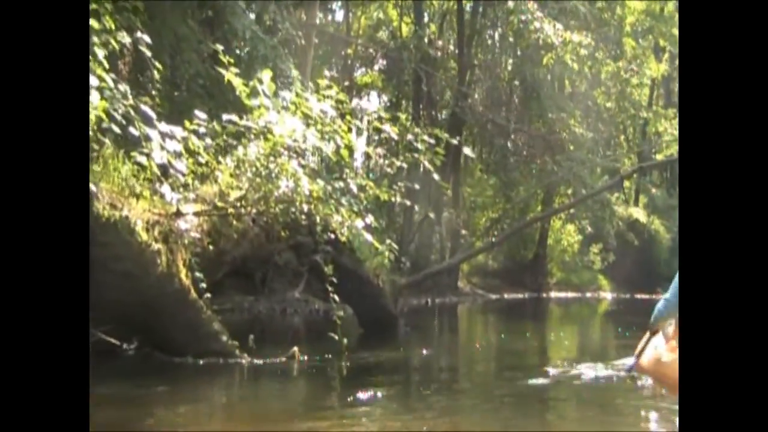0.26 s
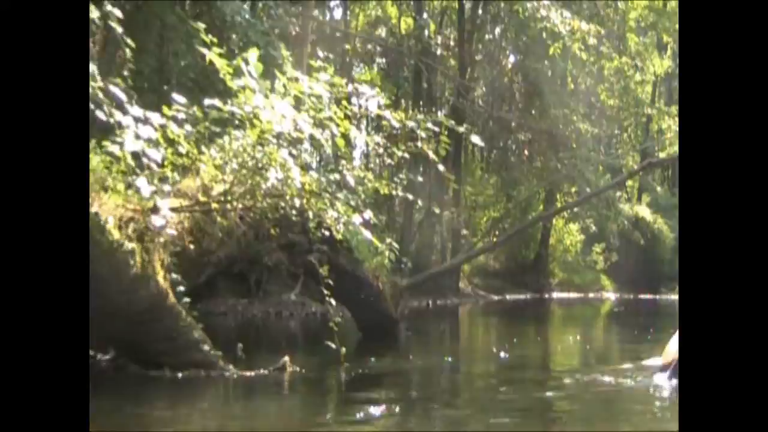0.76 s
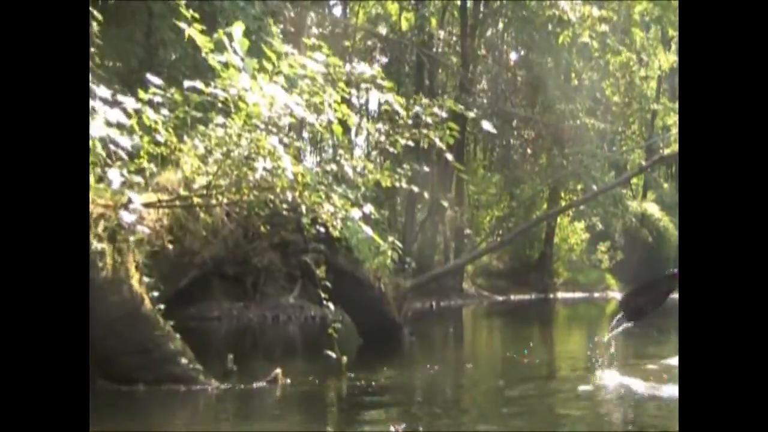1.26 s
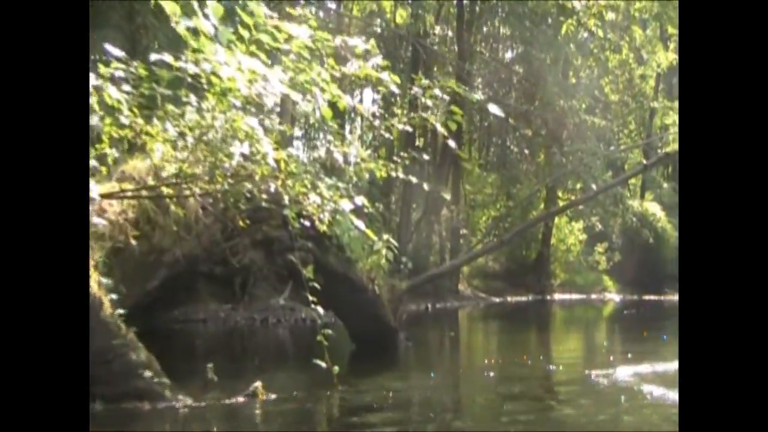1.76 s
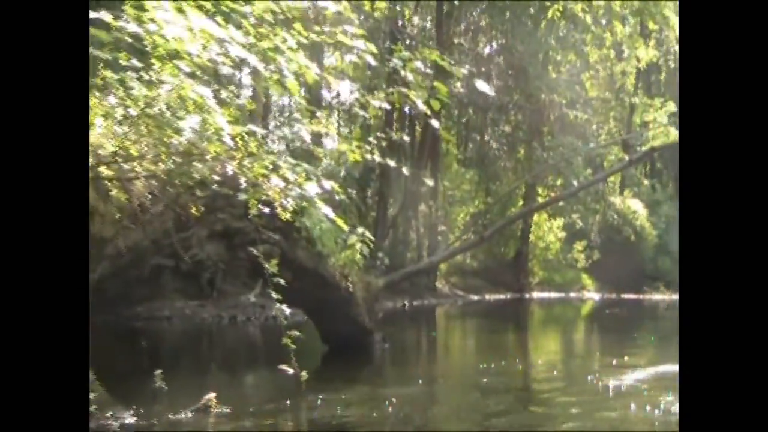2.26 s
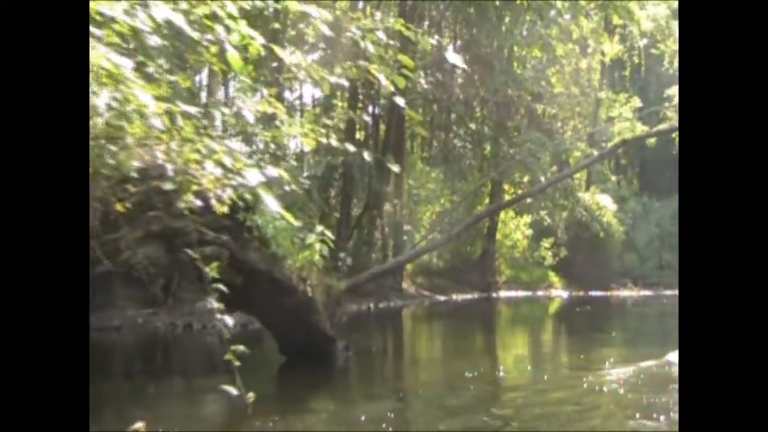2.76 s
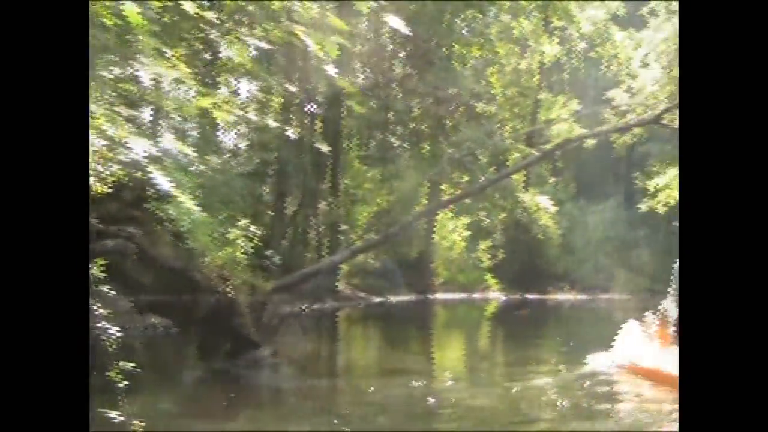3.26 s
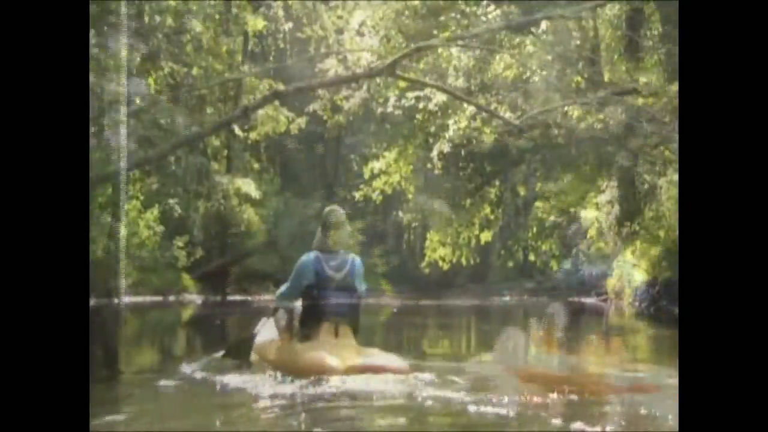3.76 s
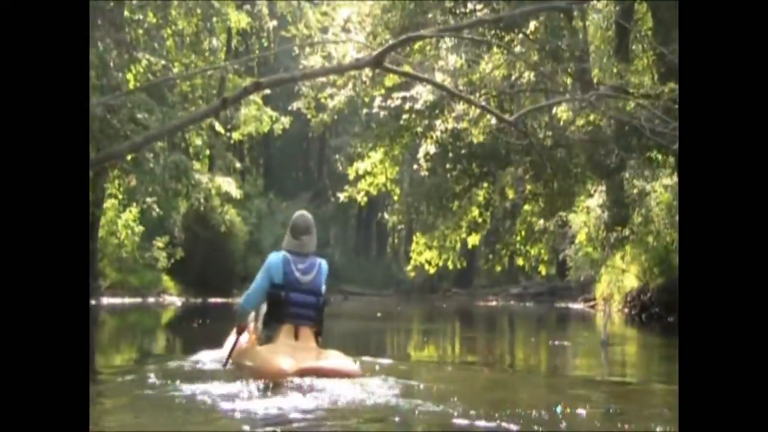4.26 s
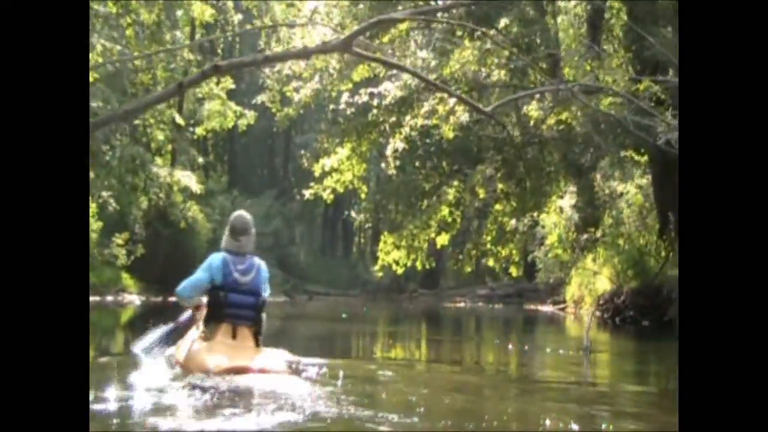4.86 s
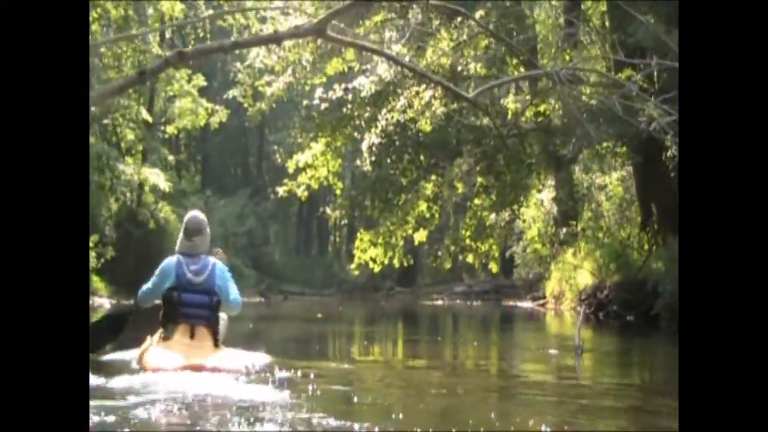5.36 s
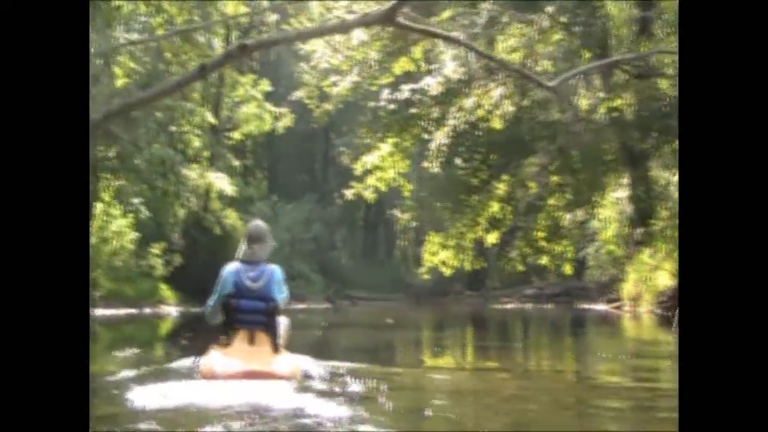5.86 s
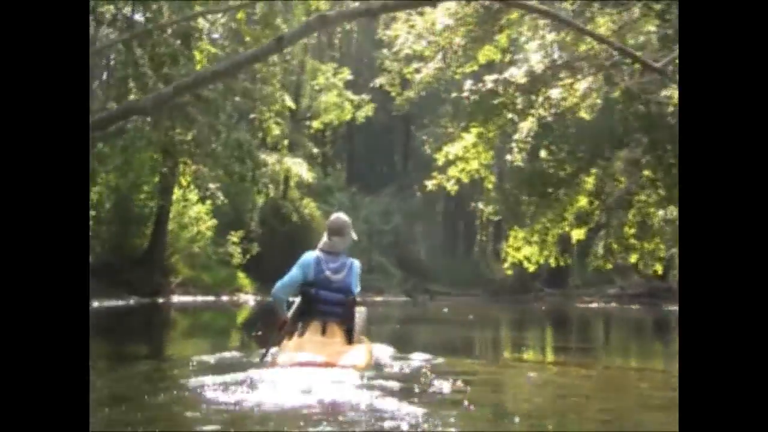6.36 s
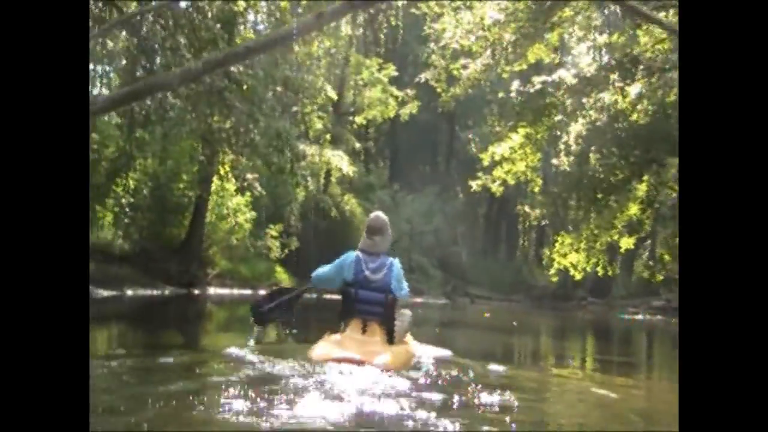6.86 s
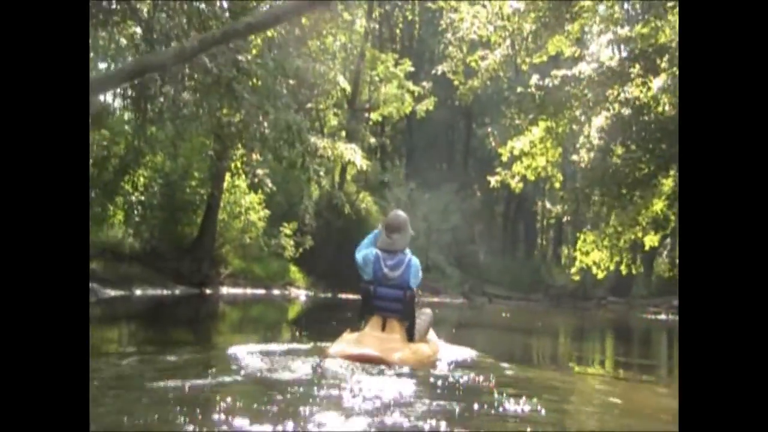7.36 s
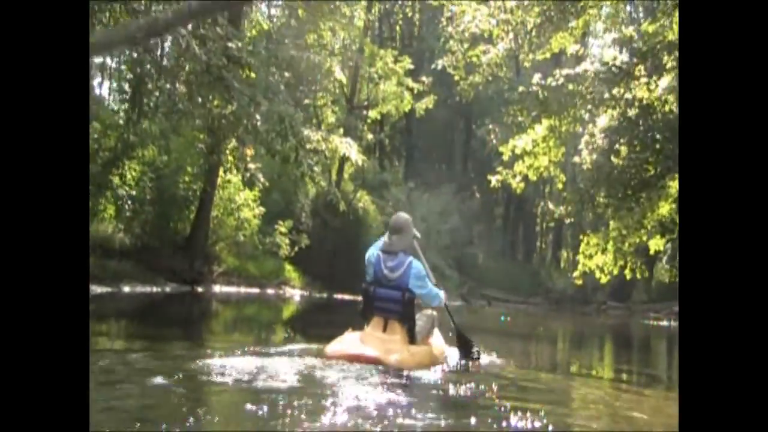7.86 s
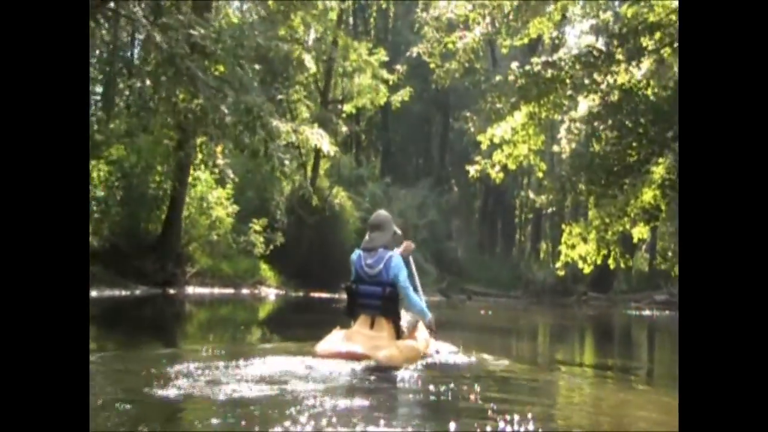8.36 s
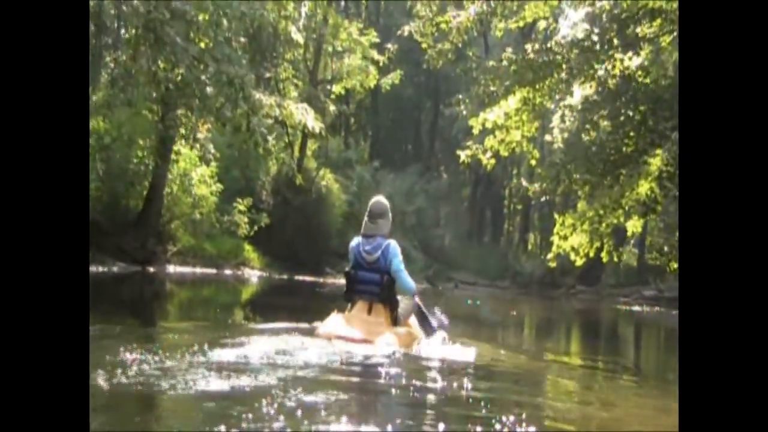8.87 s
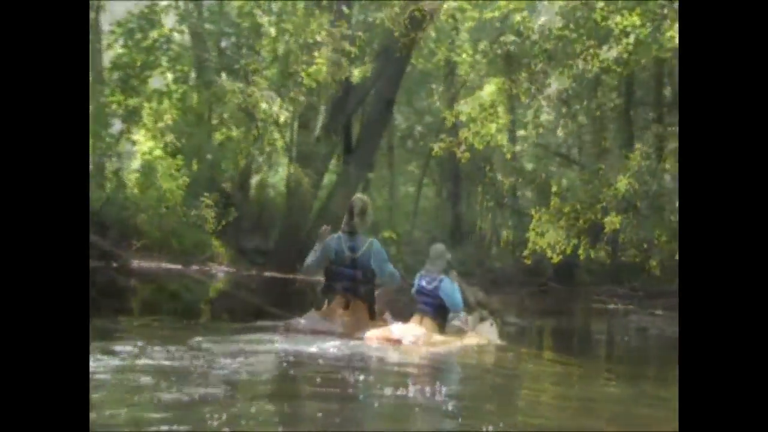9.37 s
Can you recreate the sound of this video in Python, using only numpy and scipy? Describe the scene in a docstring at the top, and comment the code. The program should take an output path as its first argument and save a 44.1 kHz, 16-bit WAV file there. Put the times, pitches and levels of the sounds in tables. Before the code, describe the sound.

Heard from a boat on a calm wooded river: gentle lapping gurgles and bright plips, a small dry tick, then a loud, hollow paddle knock on the hull with a softer one following. A close stroke then plops, churns and sprays before the water settles into trickling. A steady high hiss and faint motor hum from the handheld camera lie beneath, with dull echoes from the banks.

```python
"""Kayaks on a calm forest river

Heard from one of the boats: small waves lap in swarms of gurgling bubbles; a near blade churns air and spray.
Single bubbles, chirps, plips, drops and slaps are added one by one; the paddle rings the hollow hull's modes.
Noise bands make low air and a high hiss with a late swell; the camera's small motor hums in shaft orders.
Dull echoes return from the banks, and two unequal microphone ports pick up the sum."""
import sys
import numpy as np
from scipy import signal
from scipy.fft import rfft, irfft, next_fast_len
from scipy.io import wavfile
from scipy.ndimage import uniform_filter1d

SR = 44100
rng = np.random.default_rng(int(sys.argv[2]) if len(sys.argv) > 2 else 0)


def wav_record(signal):
    """Record a signal, one row per channel, as 16-bit PCM in the file named by sys.argv[1]."""
    frames = np.transpose(np.atleast_2d(signal))
    bounded = np.clip(frames, -1, 1)
    # unit amplitude maps onto the largest positive 16-bit level
    quanta = np.round(bounded * 32767).astype(np.int16)
    wavfile.write(sys.argv[1], SR, quanta)


N = 424683
TIME = np.arange(N) / SR  # s
FREQS = np.fft.rfftfreq(2 * next_fast_len(N // 2 + 4096), 1 / SR)  # Hz, padded past the end


def gain_of(db):
    """Decibels to gain."""
    return 10 ** (np.asarray(db) / 20)


def evened(x):
    """Scales to rms 1."""
    return x / np.sqrt(np.mean(x ** 2) + 1e-20)


def white():
    """White noise for the whole scene."""
    return rng.standard_normal(N)


def decay(t, t60):
    """Exponential decay, 60 dB in t60 seconds."""
    return np.exp(-np.log(1000) * t / t60)


def read(points, hz=FREQS):
    """The columns of a spectrum table, joined on a log-frequency axis."""
    f, *columns = np.transpose(points)
    return [np.interp(np.log(hz + 1), np.log(f + 1), c) for c in columns]


def levels(rows):
    """The dB columns of a level curve as gains at every sample."""
    s, *columns = np.transpose(rows)
    return [gain_of(np.interp(TIME, s, c)) for c in columns]


def filtered(x, response):
    """Applies a frequency response."""
    spectrum = rfft(x, 2 * (len(FREQS) - 1))
    return irfft(spectrum * response)[..., :N]


def coloured(x, spectrum):
    """Gives x a spectrum, at rms 1."""
    return evened(filtered(x, gain_of(read(spectrum)[0])))


def add(mix, s, sound):
    """Mixes a sound in at time s."""
    part = mix[max(round(s * SR), 0):][:len(sound)]
    part += sound[:len(part)]


def drift(per_s):
    """Random wander of rms 1 through per_s points a second."""
    return evened(np.interp(TIME * per_s, np.arange(600), rng.standard_normal(600)))


def surge(start, hold, db, rise_s, fade_s):
    """Gain that builds up to start, holds, then dies away; 20 dB in rise_s and in fade_s."""
    before = np.maximum(start - TIME, 0)
    after = np.maximum(TIME - start - hold, 0)
    return gain_of(db - 20 * (before / rise_s + after / fade_s))


def burst(source, s, db, t60):
    """A short, quickly dying piece of noise."""
    t = np.arange(0, 2 * t60, 1 / SR)
    return gain_of(db) * source[round(s * SR):][:len(t)] * decay(t, t60)


def snap(spectrum, size=1024):
    """One sharp minimum-phase pulse with about the given spectrum and peak 1."""
    magnitude = gain_of(read(spectrum, np.fft.rfftfreq(size, 1 / SR))[0])
    cepstrum = irfft(np.log(magnitude))
    causal = 2 * cepstrum * (np.arange(size) < size / 2)
    pulse = irfft(np.exp(rfft(causal)))
    return pulse / abs(pulse).max()


def noise(spectrum, likeness, lead_rad=0):
    """Two partly alike channels of coloured noise, left leading; their mean has rms 1."""
    a, b = white(), white()
    same, shape = np.clip(likeness, -1, 1), gain_of(read(spectrum)[0])
    shared = filtered(a, shape * same * np.exp(-1j * lead_rad))
    own = filtered(b, shape * np.sqrt(1 - same ** 2))
    pair = np.array([filtered(a, shape), shared + own])
    return pair / pair.mean(0).std()


def bubble(hz, t60, rise_octaves, attack_s=0.00083):
    """A trapped air pocket rings, its pitch sliding as it nears the surface."""
    t = np.arange(0, t60, 1 / SR)
    turns = np.cumsum(hz * 2 ** (rise_octaves * t / t60)) / SR
    return np.sin(2 * np.pi * turns) * (1 - np.exp(-t / attack_s)) * decay(t, t60)


def swarm(spectrum, per_s, cycles_at_1khz, spread_db, pitch_count=32):
    """Countless small bubbles of many sizes, at a nearly steady overall level."""
    out = np.zeros(N)
    pitches = np.geomspace(spectrum[0][0], min(spectrum[-1][0], 14000), pitch_count)
    for hz in pitches:
        t60 = cycles_at_1khz / np.sqrt(hz * 1000)
        shape = bubble(hz, t60, rng.uniform(-0.14, 0.8), attack_s=.5 / hz)
        shape = shape * np.sqrt(hz / np.sum(shape ** 2))
        draws = rng.random((1500, 3))[:int(per_s * N / SR / pitch_count)]
        excess = np.minimum(-np.log(1 - draws[:, 1]), 3)  # few are much stronger
        sizes = gain_of(spread_db * excess) * np.sign(draws[:, 2] - .5)
        for s, size in zip((draws[:, 0] * N / SR).tolist(), sizes):
            add(out, s, size * shape)
    out = coloured(out, spectrum)
    return out / np.sqrt(uniform_filter1d(out ** 2, size=8000) + 0.012)


# low air over the river: (frequency [Hz], relative level [dB])
AIR_SPECTRUM = [(20, -25), (45, -13.5), (75, 0.5), (130, -1.5), (250, -2), (450, -9.5), (1000, -12.5),
                (2800, -15), (5000, -45)]
# high hiss: (frequency [Hz], relative level [dB])
HISS_SPECTRUM = [(1500, -22.5), (2600, -20), (3000, -12), (3600, -2), (4500, -3.5), (5500, -3), (6900, -.5),
                 (7500, 4.5), (8200, 4), (8700, -5), (9100, -15), (10000, -24.5), (11000, -27),
                 (15800, -31.5)]
# stereo image of the hiss: (frequency [Hz], left-right likeness [-1..1], left lead [rad])
HISS_STEREO = [(3000, 0.61, 0.5), (6600, 0.67, 0.85), (7690, .3, -1.5), (7800, .5, -3), (8500, 0.34, -1.14),
               (10000, .2, -2)]
# shrill band at the top of the hiss: (frequency [Hz], relative level [dB])
SHRILL_SPECTRUM = [(6800, -50), (7550, -15), (7840, 1.5), (8080, -7.5), (8900, -52)]
# broader hiss that swells late: (frequency [Hz], relative level [dB])
SWELL_SPECTRUM = [(2500, -20.5), (3500, -3.5), (5000, -0.5), (6300, 2), (7600, -2.5), (8600, -22),
                  (10000, -27), (16000, -34)]
# its level: (time [s], level [dB])
SWELL_CURVE = [(0, -58), (4.5, -71), (6.5, -45), (8.6, -45.5), (9.1, -40), (9.55, -34.5), (9.63, -33.5)]
AIR_DB, HISS_DB, SHRILL_DB = -49, -39.5, -46


def background(shimmer_db=0.85, shimmer_per_s=8):
    """Low air, a slightly shimmering high hiss with its shrill band, and a broader hiss that swells late."""
    air = gain_of(AIR_DB) * noise(AIR_SPECTRUM, 0.49 * FREQS / (FREQS + 40))  # deepest rumble differs per port
    hiss = gain_of(HISS_DB) * noise(HISS_SPECTRUM, *read(HISS_STEREO))
    shrill = gain_of(SHRILL_DB) * noise(SHRILL_SPECTRUM, 0.99, -1.44)
    swell = levels(SWELL_CURVE)[0] * noise(SWELL_SPECTRUM, 0.6)
    shimmer = gain_of(shimmer_db * drift(shimmer_per_s))
    return air + shimmer * (hiss + shrill) + swell


# hum of the camera's motor: (time [s], low drone level [dB], higher buzz level [dB])
HUM_CURVES = [(0, -50, -66), (1.1, -49, -64), (1.55, -57.5, -61), (1.85, -49, -51.5), (2.8, -41, -44),
              (3.8, -49.5, -48.5), (6.1, -54, -54), (7.0, -65, -63), (7.7, -50, -68), (8.8, -45, -60),
              (9.63, -54, -59)]
# low shaft orders: (multiple of shaft rate, relative level [dB])
DRONE_ORDERS = [(3, -7.5), (4, 0), (6, -1.5)]
# high shaft orders: (multiple of shaft rate, relative level [dB])
BUZZ_ORDERS = [(8, 0.5), (9, -11), (10, -6.5), (12, -12), (14, -18)]
MOTOR_HZ = 27.26  # shaft rate, before waver


def motor(waver=0.00303, waver_per_s=1.996, flutter_db=1.7, flutter_per_s=3.064):
    """Shaft orders of the camera's motor: one wavering speed, each order fluttering in strength."""
    turns = np.cumsum(MOTOR_HZ * (1 + waver * drift(waver_per_s))) / SR
    out = np.zeros(N)
    for level, orders in zip(levels(HUM_CURVES), (DRONE_ORDERS, BUZZ_ORDERS)):
        tone = np.zeros(N)
        for k, db in orders:
            strength = gain_of(db + flutter_db * drift(flutter_per_s))
            tone += strength * np.sin(2 * np.pi * (round(k) * turns + rng.random()))
        out += level * evened(tone)
    return out


# small waves reaching the boats:
# (crest time [s], gurgle level before trim [dB], trickle level before trim [dB], time to fade 20 dB [s])
WAVE_ROWS = [(.02, -44.5, -43, .55), (.45, -45.5, -47, .85), (.66, -51.5, -46, 1.4),
             (1.66, -49.5, -49, 0.5), (2.95, -55, -53, .3), (3.27, -55, -50, .6), (3.41, -53, -51, .4),
             (3.85, -48.5, -45, .55), (4.82, -50.5, -49.5, 0.9), (5.27, -55, -47, 0.2),
             (6.58, -48.5, -45, 3), (8.56, -49.5, -53, 1.3), (8.82, -45.5, -46.5, .7),
             (9.05, -52, -47.5, .5), (9.25, -49.5, -47, 1.3)]
# low gurgle: (frequency [Hz], relative level [dB])
GURGLE_SPECTRUM = [(150, -21), (300, -4), (500, -4.5), (850, -5), (1200, -9), (1800, -16.5), (3000, -37)]
# fine trickle: (frequency [Hz], relative level [dB])
TRICKLE_SPECTRUM = [(500, -53), (1000, 1), (1400, -0.5), (2100, -0.5), (2900, -9.5), (5000, -25),
                    (9000, -25)]
WAVE_RISE_S, CALM_DB = 0.28, -63.5  # time to build 20 dB; water between waves, before trim


def lapping(gurgle_db=2.4, trickle_db=-2.2, width=0.2, clump_db=1.6, clumps_per_s=28):
    """Each small wave builds and drains away in low gurgles and finer trickles spread over the water."""
    gurgle = trickle = gain_of(CALM_DB)
    for s, low_db, high_db, fade_s in WAVE_ROWS:
        gurgle = np.hypot(gurgle, surge(s, 0, low_db, WAVE_RISE_S, fade_s))
        trickle = np.hypot(trickle, surge(s, 0, high_db, WAVE_RISE_S, fade_s))
    clumps = gain_of(clump_db * drift(clumps_per_s))  # bubbles come in small clusters
    low_bubbles = swarm(GURGLE_SPECTRUM, per_s=600, cycles_at_1khz=55, spread_db=3.5)
    high_bubbles = swarm(TRICKLE_SPECTRUM, per_s=1300, cycles_at_1khz=44, spread_db=2.6)
    low = gain_of(gurgle_db) * clumps * gurgle * low_bubbles
    high = gain_of(trickle_db) * clumps * trickle * high_bubbles
    low_side = gurgle * coloured(white(), GURGLE_SPECTRUM)
    high_side = trickle * coloured(white(), TRICKLE_SPECTRUM)
    side = width * (low_side + high_side)
    return np.array([low + high + side, low + high - side])


# large air pockets closing: (time [s], start pitch [Hz], level [dB], t60 [s])
BUBBLE_ROWS = [(.012, 780, -30, .05), (.155, 1250, -29.5, .04), (.385, 500, -33, .07),
               (.405, 740, -31, .05), (.496, 630, -31, .11), (.571, 760, -25, .043), (.635, 1200, -29, .1),
               (.87, 470, -33, .11), (.755, 887, -30, .056), (.825, 610, -33, .07), (.966, 765, -31, .06),
               (.969, 1430, -31, .035), (1.13, 1840, -29.5, .03), (1.636, 580, -31.5, .15),
               (1.684, 870, -29, .06), (2.564, 1180, -25, .018), (2.985, 900, -32, .06),
               (5.371, 335, -24.5, .083), (5.481, 2750, -18, .025), (5.488, 440, -16, .06),
               (5.4885, 890, -17, .035), (5.489, 1600, -24, .07), (5.54, 505, -16.5, .056),
               (5.603, 850, -27.5, .06), (5.632, 535, -22.5, .045), (5.673, 830, -22.5, .04),
               (5.712, 1230, -28, .035), (5.762, 810, -26, .06), (5.79, 470, -30, .06),
               (5.865, 570, -23, .06), (5.881, 619, -10, .038), (5.893, 700, -9.5, .037),
               (5.896, 1130, -13, .023), (5.907, 560, -13, .036), (5.917, 910, -16, .06),
               (5.988, 400, -25, .13), (5.988, 1150, -22, .05), (6.024, 765, -5, .024),
               (6.032, 1040, -22, .08), (6.05, 1040, -17.5, .07), (6.049, 260, -21, .09),
               (6.105, 280, -25, .12), (6.149, 475, -13.5, .065), (6.154, 290, -13.5, .1),
               (6.175, 1000, -20, .03), (6.176, 330, -19, .06), (6.224, 2200, -23, .03),
               (6.245, 790, -18, .05), (6.283, 390, -19, .047), (6.337, 745, -19, .054),
               (6.355, 860, -21, .05), (6.395, 1950, -19.5, .03), (6.449, 480, -26, .05),
               (6.475, 925, -23, .032), (6.57, 970, -23, .07), (6.658, 740, -26, .06),
               (6.751, 840, -17, .036), (6.839, 740, -27, .06), (7.395, 1260, -26.5, .033),
               (7.898, 1790, -19, .024), (7.983, 570, -30, .04), (8.15, 850, -28, .037),
               (8.765, 400, -31, .08), (8.799, 780, -29, .037), (8.865, 750, -29, .04),
               (9.219, 470, -30, .057)]


def large_bubbles(rise_octaves=.33):
    """Large single air pockets ring as they close, gliding up in pitch."""
    out = np.zeros(N)
    for s, hz, db, t60 in BUBBLE_ROWS:
        add(out, s, gain_of(db) * bubble(hz, t60, rise_octaves))
    return out


# air squeezed out of closing eddies:
# (time [s], start pitch [Hz], level before wobble [dB], length [s], climb [octaves])
CHIRP_ROWS = [(.03, 720, -36, .05, 1), (1.423, 1580, -39, .022, .8), (3.975, 960, -41, .045, .25),
              (4.015, 520, -39.5, .058, 1.5), (4.052, 670, -40.5, .042, 1.2), (4.112, 520, -42, .035, 1.2),
              (1.91, 1100, -40, .03, .6), (5.418, 1400, -13.5, .01, .8), (5.496, 480, -26, .014, 1.8),
              (5.976, 680, -19, .016, 1.1)]


def chirps(roughness=.45):
    """Shrinking cavities climb in pitch; their wobble makes the tone uneven."""
    out = np.zeros(N)
    wobble = 1 + roughness * evened(uniform_filter1d(white(), size=160))
    for s, hz, db, length_s, octaves in CHIRP_ROWS:
        u = np.arange(0, 1, 1 / (length_s * SR))
        tone = np.sin(2 * np.pi * np.cumsum(hz * 2 ** (octaves * u)) / SR)
        swell = np.sin(np.pi * u) * wobble[round(s * SR):][:len(u)]
        add(out, s, gain_of(db) * swell * tone)
    return out


# bright plips in the lapping water and drops around the blade:
# (time [s], peak level [dB], brightest frequency [Hz])
DROP_ROWS = [(.16, -28, 1600), (.577, -23, 1150), (.651, -25, 1500), (.737, -28, 1600), (.971, -26, 1400),
             (3.655, -29, 2500), (5.404, -24, 1800), (5.409, -18, 2200), (5.42, -19, 3300),
             (5.424, -18, 4000), (5.432, -19, 3400), (5.454, -24, 2700), (5.459, -26, 3900),
             (5.4895, -9, 3000), (5.506, -23, 1900), (5.521, -24, 3400), (5.533, -20, 2300),
             (5.536, -23, 5200), (5.636, -22, 1500), (5.713, -25, 2000), (5.897, -14, 2500),
             (5.989, -18, 2000), (6.025, -21, 1900), (6.174, -22, 2000), (6.284, -22, 4200),
             (6.36, -22, 4000)]
# one plip or drop: (multiple of brightest frequency, relative level [dB])
DROP_SPECTRUM = [(.1, -32), (.45, -9), (1, 0), (1.45, -4), (2.4, -29), (4.5, -42)]


def drops(splinter_db=-7, count=3, scatter_s=.013):
    """Each plip or drop is a sharp tick, and a few smaller ones patter within scatter_s."""
    out = np.zeros(N)
    for s, db, hz in DROP_ROWS:
        add(out, s, gain_of(db) * snap(np.multiply(DROP_SPECTRUM, [hz, 1])))
        for late, size, pitch in rng.random((count, 3)):
            splinter_hz = hz * 2 ** (pitch - .5)
            splinter = snap(np.multiply(DROP_SPECTRUM, [splinter_hz, 1]))
            add(out, s + scatter_s * late, gain_of(db + splinter_db) * size * splinter)
    return out


# water slapping on blade and boat: (time [s], level before trim [dB])
SLAP_ROWS = [(.372, -34), (.448, -33), (.497, -33), (.573, -31), (.646, -30), (.83, -34), (5.272, -28),
             (5.414, -22), (5.882, -23), (5.896, -12), (5.987, -21), (6.124, -25), (6.283, -22),
             (6.358, -24), (6.488, -27), (8.151, -29), (8.263, -28.5)]
# slap: (frequency [Hz], relative level [dB])
SLAP_SPECTRUM = [(200, -23), (600, 1.5), (1700, 4.5), (2800, -1.5), (5000, -6.5), (8000, -32), (10000, -20),
                 (16000, -41)]


def slaps(trim_db=-3, t60=.026):
    """Water slaps blade and boat in short, quickly dying noise."""
    out, wet = np.zeros(N), coloured(white(), SLAP_SPECTRUM)
    for s, db in SLAP_ROWS:
        add(out, s, burst(wet, s, db + trim_db, t60))
    return out


# small dry tick: (frequency [Hz], relative level [dB])
TICK_SPECTRUM = [(200, -20), (900, -7), (2400, -5), (3700, -15), (5000, -6), (5600, 3), (6400, -9),
                 (8000, -20), (16000, -36)]
TICK_S, TICK_DB = 2.1653, -18.3  # time; peak of the pulse


def tick(tail_db=-10, tail_t60=.02):
    """A crisp click with a very short noise tail."""
    out = np.zeros(N)
    add(out, TICK_S, gain_of(TICK_DB) * snap(TICK_SPECTRUM))
    add(out, TICK_S, burst(coloured(white(), TICK_SPECTRUM), TICK_S, TICK_DB + tail_db, tail_t60))
    return out


# a short blade swish before the first knock, then the pushes of one near stroke:
# (start time [s], hold [s], churn level [dB], spray level before trim [dB], time for churn to fade 20 dB [s])
PUSH_ROWS = [(2.995, .06, -44, -58, .05), (5.405, .028, -40, -35.5, .05), (5.492, .04, -35.5, -38.5, .11),
             (5.6, .21, -39.5, -54, .2), (5.88, .04, -33, -39, .22), (5.982, .05, -34, -38, .4),
             (6.085, .06, -32.5, -39, .2), (6.18, .07, -30, -34.5, .23), (6.285, .085, -30.5, -33.2, .28)]
# air folded under: (frequency [Hz], relative level [dB])
CHURN_SPECTRUM = [(120, -35), (200, -9), (280, -1), (600, -5), (1000, -5), (1500, -13), (3000, -22.5)]
# merged smallest bubbles: (frequency [Hz], relative level [dB])
WASH_SPECTRUM = [(60, -50), (200, -11), (300, -3), (600, -2), (1100, -2), (1600, -8), (2600, -12),
                 (4000, -28), (9000, -60)]
# fine spray: (frequency [Hz], relative level [dB])
SPRAY_SPECTRUM = [(600, -18), (1500, -1), (2600, -1), (4000, -9.5), (6000, -7), (8500, -27), (10000, -16),
                  (16000, -30)]
PUSH_RISE_S, SPRAY_FADE_S = .025, .12  # each the time for 20 dB


def blade(spray_db=-1.0, wash=.65):
    """The blade folds air into the water and throws fine spray; the smallest bubbles merge into a wash."""
    churn_surges = [surge(s, hold, db, PUSH_RISE_S, fade_s) for s, hold, db, _, fade_s in PUSH_ROWS]
    spray_surges = [surge(s, hold, db, PUSH_RISE_S, SPRAY_FADE_S) for s, hold, _, db, _ in PUSH_ROWS]
    churn, spray = np.max(churn_surges, axis=0), np.max(spray_surges, axis=0)
    low = swarm(CHURN_SPECTRUM, per_s=1700, cycles_at_1khz=40, spread_db=3.2)
    low = low + wash * coloured(white(), WASH_SPECTRUM)
    high = swarm(SPRAY_SPECTRUM, per_s=3400, cycles_at_1khz=17, spread_db=4.6)
    return churn * evened(low) + gain_of(spray_db) * spray * high


# paddle against hull: (time [s], ring level [dB], pitch factor of the place struck,
# dullness corner [Hz], extra boom [dB], crack level [dB], clatter level [dB])
KNOCK_ROWS = [(3.065, 3.3, 0.97, 3950, 1.5, -2, -22), (3.7053, -14.5, .7, 1550, 0, -9, -27),
              (8.1901, -13, 0.93, 790, 11, -36, -50)]
# modes of the hollow hull, before the pitch factor: (frequency [Hz], relative level [dB], t60 [s])
HULL_MODES = [(86.5, -33, 0.45), (106, -40, 0.27), (120.3, -26, 0.3), (138.3, -15, 0.19), (152, -23, 0.25),
              (194, -17, 0.16), (246, -17, 0.12), (380, -27, 0.2), (440, -8.5, 0.067), (476, -22.5, 0.19),
              (557, -11, 0.095), (635, -15.5, 0.071), (717, -10, 0.048), (824, -12, 0.051),
              (1020, -19, .045)]
# crack and scuff: (frequency [Hz], relative level [dB])
CRACK_SPECTRUM = [(40, -40), (200, -14), (900, 7), (2300, -3), (5500, -3.5), (8000, -21), (10000, -35),
                  (16000, -46)]
# dense high modes: (frequency [Hz], relative level [dB])
CLATTER_SPECTRUM = [(60, -40), (300, -14), (800, 2), (1300, 0), (2300, -1), (2750, -17), (6000, -32),
                    (10000, -50)]


def knocks(scuff_db=-20, scuff_t60=0.022, clatter_t60=.055, rattle_db=-29, rattle_t60=0.18,
           boom_hz=140, build_s=0.009, lowest_hz=75, crack_reach=1.8):
    """Each blow cracks, scuffs, rings the hull's low modes, clatters in its high ones and rattles inside."""
    out, t = np.zeros(N), np.arange(SR // 2) / SR
    scuff, clatter = coloured(white(), CRACK_SPECTRUM), coloured(white(), CLATTER_SPECTRUM)
    rattle = coloured(white(), [(40, -35), (150, -2), (800, 1.5), (1500, 0), (4000, -32)])  # (Hz, dB)
    for s, db, pitch, dull_hz, boom_db, crack_db, clatter_db in KNOCK_ROWS:
        ring = np.zeros(len(t))
        for hz, mode_db, t60 in HULL_MODES:
            extra_db = boom_db / (1 + (hz / boom_hz) ** 4)  # in the lowest modes, set for each blow
            force = gain_of(db + mode_db + extra_db)
            build = 1 - np.exp(-t / build_s * (hz / boom_hz) ** 2)  # slow bending waves fill it later
            ring += force * build * np.sin(2 * np.pi * hz * pitch * t) * decay(t * pitch, t60)
        band_hz = [lowest_hz * pitch, min(dull_hz, SR / 4)]
        contact = signal.butter(2, band_hz, "band", fs=SR, output="sos")
        add(out, s, signal.sosfilt(contact, ring))  # soft contact weakens the high modes
        edge = signal.butter(2, min(crack_reach * dull_hz, SR / 3), fs=SR, output="sos")
        crack = gain_of(crack_db) * snap(CRACK_SPECTRUM)
        add(out, s, signal.sosfilt(edge, crack))  # and blunts the crack
        add(out, s, signal.sosfilt(edge, burst(scuff, s, crack_db + scuff_db, scuff_t60)))
        add(out, s, burst(clatter, s, clatter_db, clatter_t60))
        add(out, s, burst(rattle, s, db + rattle_db, rattle_t60))
    return out


# low hull swells after the blows: (time [s], pitch [Hz], peak level [dB], length [s])
BOOM_ROWS = [(3.11, 118, -18, .036), (3.2, 120, -29, .056), (3.762, 88, -34, .036), (8.192, 120, -27, .028),
             (8.24, 81, -38, .1)]


def booms():
    """Soft swells of the hollow hull's lowest notes."""
    out = np.zeros(N)
    for s, hz, db, length_s in BOOM_ROWS:
        t = np.arange(0, length_s, 1 / SR)
        add(out, s, gain_of(db) * np.sin(np.pi * t / length_s) * np.sin(2 * np.pi * hz * t))
    return out


def banks(x, t60=0.57, build_s=0.0058, dull_hz=2500):
    """Scattered, dull echoes from the banks and trees."""
    t = np.arange(SR) / SR
    taps = rng.standard_normal((2, SR)) * (rng.random((2, SR)) < .05)  # sparse
    taps = taps * (1 - np.exp(-t / build_s)) * decay(t, t60)
    tail = signal.fftconvolve(x[None], taps / np.linalg.norm(taps[0]), axes=1)[:, :N]
    return filtered(tail, 1 / (1 + 1j * FREQS / dull_hz))


def scene(lag_s=.00004, water_echo_db=-15, knock_echo_db=-27):
    """All sources; the near water is a little to the right, so it reaches the left port later."""
    bed = background() + motor() + lapping()
    water = large_bubbles() + chirps() + drops() + slaps() + blade()
    hull = tick() + knocks() + booms()
    near = np.array([filtered(water, np.exp(-2j * np.pi * FREQS * lag_s)), water])
    echoes = banks(gain_of(water_echo_db) * water + gain_of(knock_echo_db) * hull)
    return near + hull + echoes + bed


# unequal microphone ports: (frequency [Hz], left minus right [dB], left lead [rad])
PORT_BALANCE = [(20, 3, -0.12), (107, 4, -0.97), (300, 1.5, -0.44), (700, 1.1, -0.29), (2000, 1.5, -0.34),
                (4430, 0.5, -0.15), (8000, -2.5, -0.18), (14000, -3.5, -0.83)]
EDGE_HZ = 15900  # top of the band


def record(dry):
    """Unequal microphone ports, overload at full scale, then the band limit."""
    balance_db, lead_rad = read(PORT_BALANCE)
    half = gain_of(balance_db / 2) * np.exp(.5j * lead_rad)
    heard = np.clip(filtered(dry, np.array([half, 1 / half])), -1, 1)
    lowpass = signal.firwin(511, EDGE_HZ, window=("kaiser", 9), fs=SR)
    return signal.oaconvolve(heard, lowpass[None], "same")


dry = scene()
out = record(dry)
wav_record(out)
```